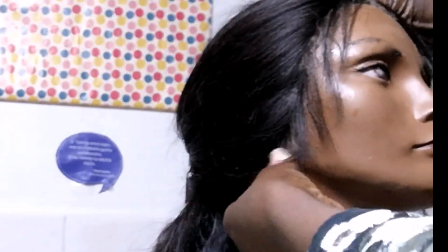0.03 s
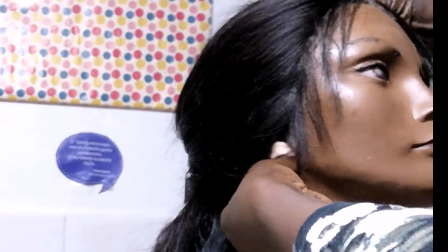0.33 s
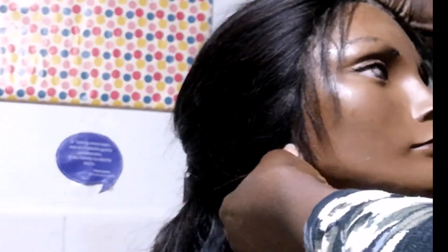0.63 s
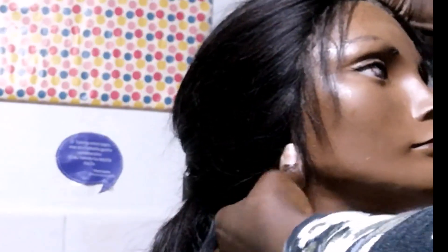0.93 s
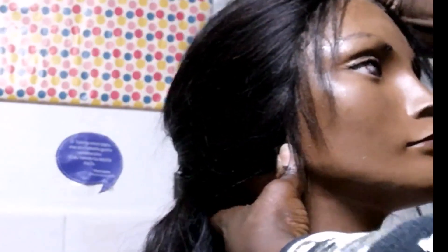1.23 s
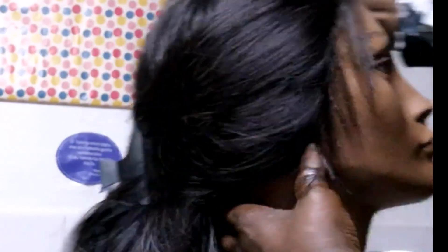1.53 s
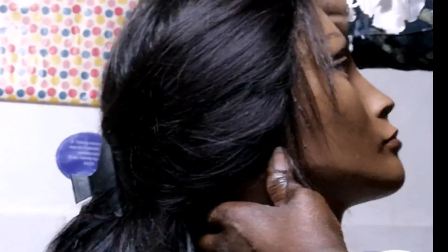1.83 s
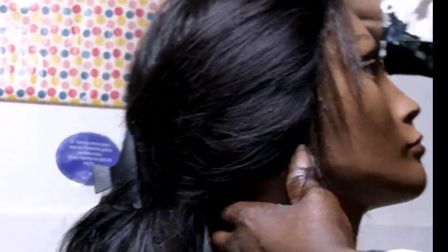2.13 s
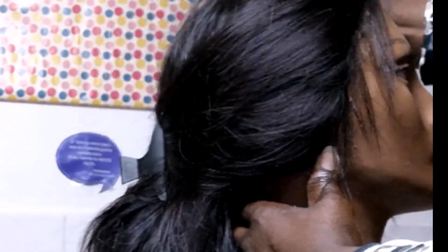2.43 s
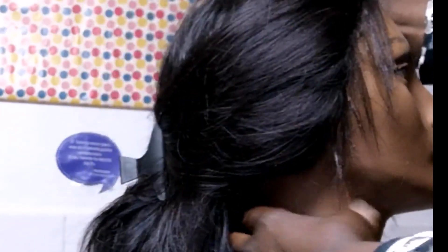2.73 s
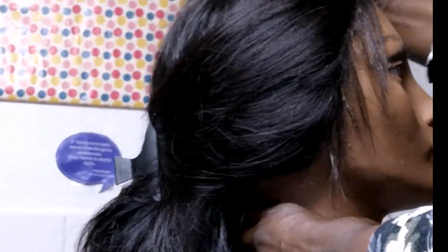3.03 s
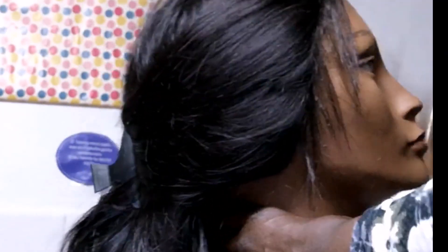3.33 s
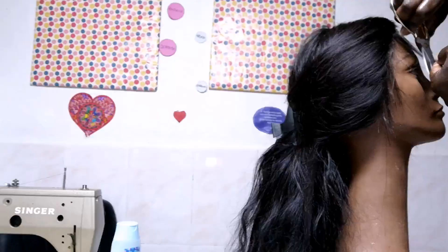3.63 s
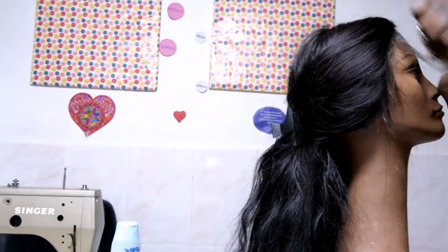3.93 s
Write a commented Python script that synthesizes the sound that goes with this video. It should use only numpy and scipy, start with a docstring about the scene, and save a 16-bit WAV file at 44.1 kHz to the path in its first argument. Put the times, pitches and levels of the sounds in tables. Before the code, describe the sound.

Fingers and a tool tap lightly while wig hair rustles over a faint hum.

```python
"""Hands work on a wig on a mannequin head in a small, hard-walled room.
From the start, fingers and a tool tap lightly over mains hum, a low rumble and hiss.
Hair rustles in short strokes as strands slip past each other, and near 1.9 s it swishes as the head turns.
One sharp tap comes at 3.15 s, then a last few rustles, small scrapes and dull bumps.
All of it is heard through a microphone that loses the highest treble."""
import sys
import numpy as np
from scipy import signal
from scipy.fft import rfft, irfft, next_fast_len
from scipy.io import wavfile
from scipy.ndimage import uniform_filter1d

SR = 44100
rng = np.random.default_rng(int(sys.argv[2]) if len(sys.argv) > 2 else 0)


def dump(signal):
    """Clip the signal to [-1, 1] and save it as 16-bit WAV at the path in sys.argv[1]."""
    limited = np.clip(np.atleast_2d(signal).T, -1, 1)
    pcm = np.round(limited * 32767).astype(np.int16)
    wavfile.write(sys.argv[1], SR, pcm)


N = 176400   # 4 seconds

# Light taps: start_s, hardness_0_to_1, level_db, bass_db, upper_mid_db, treble_db, direct_db
# (the last four are relative to level_db)
TAPS = [(0.003, 0.021, -8.5, -10, -22, -29, -8), (0.143, 0.94, -4.5, -6, -9, -18.5, -13),
        (0.466, 0.96, -3, -7, -7.5, -14.5, -14), (0.608, 0.97, -8.5, -1.5, -16, -7.5, -9),
        (0.795, 0.58, -9, 6.5, -14, -14, -10), (1.093, 0.57, -8, 3, -25, -24, -8),
        (1.133, 0, -9, 2, -19, -20, -12), (1.307, 0.63, -12, 3, 2.5, -10, -20),
        (1.452, 0.66, -9, 1, -18, -18, -10), (1.770, 0.86, -4.5, -4.5, -7, -11.5, -7.5),
        (2.133, 0.98, -12, 4, -14, -21, -8), (2.301, 1, -12, 6, -18, -24, -6.5),
        (2.721, 0.82, -8.5, 8, -27, -13, 0), (2.949, 0.18, -14, 0, -10.5, -8, -5),
        (3.075, 0.65, -17, 0, -6, -23, -8), (3.150, 0.88, 6.5, -7.5, -9.5, -11.5, -13.5),
        (3.602, 1, -19, 19.5, -5, 0.5, -4.5)]
# Where a tap's tone is set: bass_hz, mid_hz, upper_mid_hz, treble_hz
TAP_BANDS_HZ = [300, 1300, 3200, 6500]
# The tone all taps share: frequency_hz, gain_db
TAP_TONE = [(130, -1), (350, -2.5), (560, -0.5), (800, -0.5), (1300, -2.5), (2100, -0.5), (2900, -2),
            (3850, -0.5), (4700, -7), (6700, 1.5)]
# Notes that the tapped things ring at: pitch_hz, gain_db, decay_s (time to fade by 60 dB)
RING_NOTES = [(368, -0.5, 0.21), (591, -2, 0.11), (993, -13, 0.094), (1231, 5, 0.086), (1615, 7, 0.087),
              (2230, -5.5, 0.13), (6740, -10, 0.076)]
# Strokes over the hair: peak_s, rise_s, fall_s, level_db, bass_db, mid_db, treble_db
# (the last three are relative to level_db)
STROKES = [(0.835, 0.044, 0.025, -58.5, 13, 10.5, 10.5), (1.265, 0.016, 0.0086, -44.5, 7.5, 14, -7),
           (1.335, 0.024, 0.022, -55.5, 12, 15, -4), (1.57, 0.095, 0.099, -59, 14.5, 12, 1),
           (1.868, 0.083, 0.044, -39.5, -1.5, -2, 3), (2.775, 0.035, 0.051, -63.5, 19, 17, 8),
           (2.935, 0.06, 0.014, -54.5, -5, 11, 2.5), (3.039, 0.034, 0.022, -51, 14, 9, 1),
           (3.445, 0.013, 0.0058, -40.5, 3.5, -1, 2.5), (3.523, 0.011, 0.014, -50, 8, -4, 6),
           (3.766, 0.035, 0.037, -51, 15, 6, 8)]
# Where a stroke's tone is set: bass_hz, mid_hz, upper_mid_hz, treble_hz
STROKE_BANDS_HZ = [350, 900, 3200, 6500]
# Small scrapes that catch at one pitch: peak_s, swell_s, pitch_hz, width_hz, level_db
SCRAPES = [(1.32, 0.0092, 2950, 700, -51.5), (2.41, 0.052, 325, 80, -60.5), (2.785, .025, 857, 110, -56.5),
           (3.447, .012, 3360, 1710, -52), (3.777, 0.027, 646, 220, -53)]
# One slow microphone sway, then dull handling bumps: peak_s, swell_s, pitch_hz, width_hz, level_db
BUMPS = [(1.19, 0.074, 8.4, 2.4, -30), (2.738, 0.0089, 215, 44, -50.5), (3.24, 0.065, 54.7, 14, -47),
         (3.612, 0.017, 204, 150, -53.5), (3.80, 0.065, 37, 12, -49)]
# How long the room takes to fade by 60 dB: frequency_hz, decay_s
ROOM_DECAY = [(150, 0.25), (500, 0.29), (1300, 0.3), (3000, 0.21), (7000, 0.19)]
# Mains hum: pitch_hz, level_db
HUM = [(100, -47), (200, -72.5), (300, -68)]
# The tone of the low rumble: frequency_hz, gain_db
RUMBLE_TONE = [(1, -20), (4, -18.5), (8, -4.5), (13, -11.5), (22, -47), (38, -42), (50, -28), (75, -30),
               (120, -43), (250, -80)]
# The tone of the room's steady hiss: frequency_hz, gain_db
ROOM_TONE = [(100, -50.5), (180, -42.5), (300, -45), (520, -43.5), (750, -49), (1300, -54.5), (2500, -56),
             (4500, -58), (6800, -55.5)]
# The microphone's treble loss: frequency_hz, gain_db
MIC_TONE = [(7100, -1.5), (7450, -8), (7750, -24), (8100, -57), (9000, -68)]

SCUFF_S, RING_DB, RING_BUILD_S = 0.011, -44.5, 0.0036
SLIPS_PER_S, SLIP_SPREAD_DB, SMOOTH_SHARE, STROKE_DIRECT_DB = 2500, 1.5, 0.31, -8
ROOM_BUILD_S, ROOM_SMOOTHING_HZ = 0.00067, 140
FAR_WALL_S, FAR_WALL_DB = 0.034, -11
HISS_DB, CUTOFF_HZ = -79, 15700


def taps():
    """Hard taps click and soft ones scuff; the spot that is touched sets the tone."""
    out, t = np.zeros(N), np.arange(SR // 8) / SR
    lead = SR // 100   # silence in front gives the tone shaping space to spread
    for start_s, hardness, level_db, bass, upper_mid, treble, direct_db in TAPS:
        click = t == 0
        scuff = unit_energy(rng.standard_normal(len(t)) * np.sqrt(t) * np.exp(-(t / SCUFF_S) ** 2 / 2))
        contact = np.sqrt(hardness) * click + np.sqrt(1 - hardness) * scuff
        tap = shape_tone(np.pad(contact, (lead, 0)), TAP_TONE)
        tap = shape_tone(tap, list(zip(TAP_BANDS_HZ, [bass, 0, upper_mid, treble])))
        add(out, from_db(level_db) * room(tap, direct_db), start_s - lead / SR)
    return out


def tap_ringing():
    """Every tap sets the same few notes ringing, bright taps more than dull ones."""
    start_s, _, level_db, _, upper_mid_db = np.transpose(TAPS)[:5]
    out = np.zeros(N)
    for pitch_hz, gain_db, decay_s in RING_NOTES:
        strike_db = level_db + upper_mid_db / 2 + gain_db + RING_DB + rng.normal(0, 1, len(TAPS))
        clicks = np.zeros(N)
        clicks[(start_s * SR).astype(int)] = from_db(strike_db)
        out += ring(clicks, pitch_hz, decay_s)
        out -= ring(clicks, pitch_hz, RING_BUILD_S * np.log(1000))   # softens the start of the note
    return out


def ring(clicks, pitch_hz, decay_s):
    """Each click starts a pure note that fades by 60 dB in decay_s."""
    fade, angle = from_db(-60 / (decay_s * SR)), 2 * np.pi * pitch_hz / SR
    return signal.lfilter([0, np.sin(angle)], [1, -2 * fade * np.cos(angle), fade ** 2], clicks + 1e-18)


def hair_strokes():
    """The rustle of hair swells and fades with the speed of each stroke."""
    out, friction = np.zeros(N), hair_friction()
    for peak_s, rise_s, fall_s, level_db, bass, mid, treble in STROKES:
        t = np.arange(N) / SR - peak_s
        near = np.abs(t) < .5
        slope_s = np.where(t[near] < 0, rise_s, fall_s)
        speed = np.exp(-(t[near] / slope_s) ** 2 / np.sqrt(2))
        rustle = shape_tone(friction[near] * speed, list(zip(STROKE_BANDS_HZ, [bass, mid, 0, treble])))
        add(out, from_db(level_db) * room(rustle, STROKE_DIRECT_DB), peak_s - .5)
    return out


def hair_friction():
    """Strands slip past each other, making tiny clicks on top of a smooth hiss."""
    slips = (rng.random(N) < SLIPS_PER_S / SR) * rng.choice([-1, 1], N)
    slips = slips * from_db(SLIP_SPREAD_DB * np.minimum(rng.exponential(1, N), 4))
    hiss = np.sqrt(SMOOTH_SHARE) * rng.standard_normal(N)
    return hiss + np.sqrt((1 - SMOOTH_SHARE) * N) * unit_energy(slips)


def uneven_pushes(rows):
    """A scrape or bump is an uneven push that swells and fades around one pitch."""
    out, t = np.zeros(N), np.arange(SR) / SR - .5
    for peak_s, swell_s, pitch_hz, width_hz, level_db in rows:
        band = signal.iirpeak(pitch_hz, pitch_hz / width_hz, fs=SR)
        push = signal.lfilter(*band, signal.lfilter(*band, rng.standard_normal(SR)))
        swell = np.exp(-(t / swell_s) ** 2 / 2)
        add(out, from_db(level_db) * np.linalg.norm(swell) * unit_energy(push * swell), peak_s - .5)
    return out


def room(sound, direct_db):
    """The direct sound, then a wash of wall echoes, new for each spot, whose treble dies first."""
    t = np.arange(SR // 3) / SR
    noise, hz = rfft(rng.standard_normal(len(t))), np.fft.rfftfreq(len(t), 1 / SR)
    bands_hz, decays_s = np.transpose(ROOM_DECAY)
    echoes = np.zeros(len(t))
    for weights, decay_s in zip(np.eye(len(bands_hz)), decays_s):
        band = irfft(noise * read_curve(list(zip(bands_hz, weights)), hz), len(t))
        echoes += band * unit_energy(from_db(-60 * t / decay_s) * (1 - np.exp(-t / ROOM_BUILD_S)))
    # A second wave of echoes comes back from the far wall.
    echoes += from_db(FAR_WALL_DB) * np.pad(echoes, (int(FAR_WALL_S * SR), 0))[:len(t)]
    # Even out the echoes so that no range of pitches stands out.
    spectrum = rfft(echoes, 2 * len(t))
    power = uniform_filter1d(np.abs(spectrum) ** 2, size=int(2 * ROOM_SMOOTHING_HZ / hz[1]))
    echoes = irfft(spectrum / np.sqrt(power))[:len(t)]
    return signal.fftconvolve(sound, echoes + from_db(direct_db) * (t == 0))


def background():
    """The mains hums on three steady notes over a low rumble and the room's hiss."""
    t = np.arange(N) / SR
    hum = sum(np.sqrt(2) * from_db(db) * np.sin(2 * np.pi * (hz * t + rng.random())) for hz, db in HUM)
    below_300_hz = signal.butter(2, 300, fs=SR, output="sos")
    rumble = signal.sosfilt(below_300_hz, shape_tone(rng.standard_normal(N), RUMBLE_TONE))
    return hum + rumble + shape_tone(rng.standard_normal(N), ROOM_TONE)


def from_db(db):
    """Turn decibels into a number to multiply by."""
    return 10 ** (np.asarray(db) / 20)


def read_curve(points, hz):
    """Read between a table's rows, giving every octave equal space."""
    known_hz, values = np.transpose(points)
    return np.interp(np.log(np.maximum(hz, 1e-3)), np.log(known_hz), values)


def shape_tone(sound, points):
    """Turn frequencies up or down along a curve of (frequency_hz, gain_db) points."""
    size = next_fast_len(2 * len(sound))
    gain = from_db(read_curve(points, np.fft.rfftfreq(size, 1 / SR)))
    return irfft(rfft(sound, size) * gain, size)[:len(sound)]


def unit_energy(sound):
    """Scale a sound to a total energy of one."""
    return sound / np.sqrt(np.sum(sound ** 2) + 1e-20)


def add(out, sound, start_s):
    """Mix a sound into a track from start_s on."""
    start = int(start_s * SR)
    part = sound[max(-start, 0):N - start]
    out[max(start, 0):max(start, 0) + len(part)] += part


def scene():
    """Taps, hair strokes, scrapes and bumps over the background, in one channel."""
    mix = background() + taps() + tap_ringing() + hair_strokes()
    return (mix + uneven_pushes(SCRAPES) + uneven_pushes(BUMPS))[None]


def record(dry):
    """The microphone loses the highest treble; faint recorder hiss reaches up to the cut-off."""
    heard = shape_tone(dry[0], MIC_TONE) + from_db(HISS_DB) * rng.standard_normal(N)
    below_cutoff = signal.ellip(10, .1, 70, CUTOFF_HZ, fs=SR, output="sos")
    return signal.sosfilt(below_cutoff, heard)[None]


dry = scene()
out = record(dry)
dump(out)
```